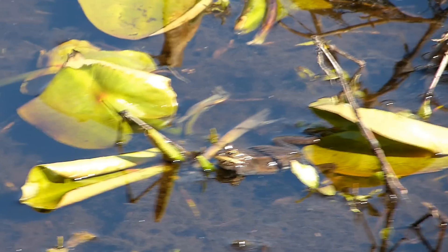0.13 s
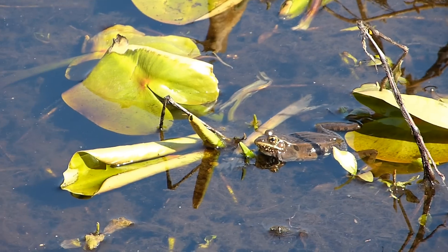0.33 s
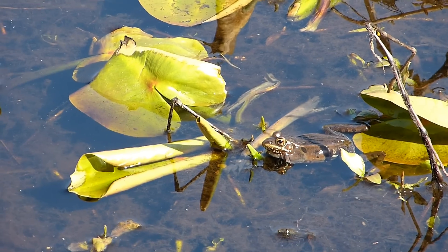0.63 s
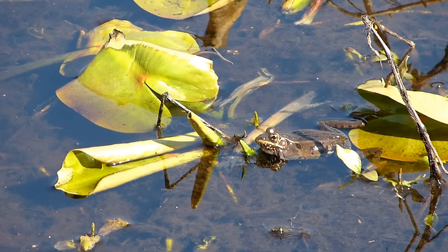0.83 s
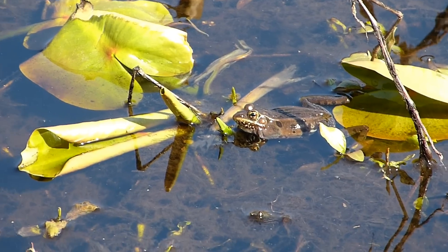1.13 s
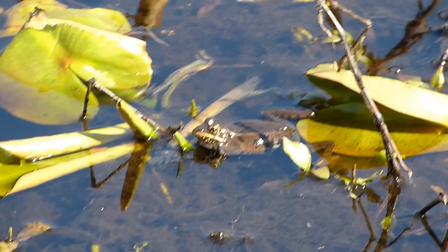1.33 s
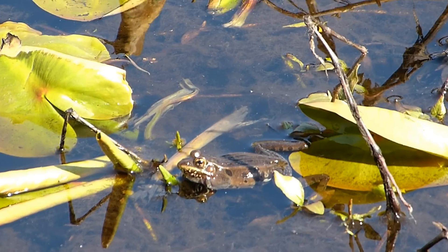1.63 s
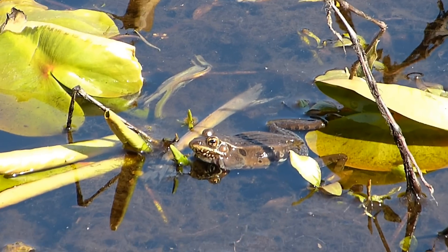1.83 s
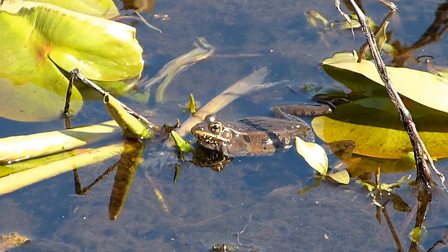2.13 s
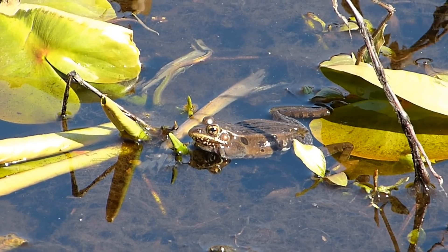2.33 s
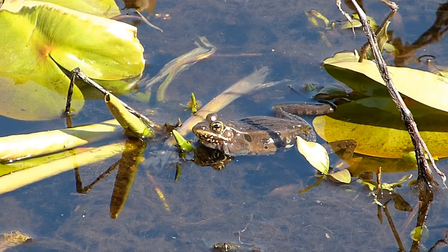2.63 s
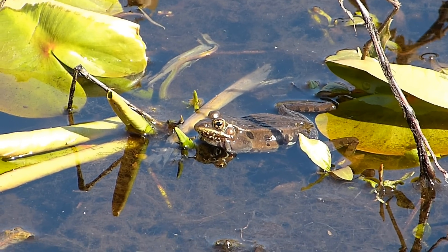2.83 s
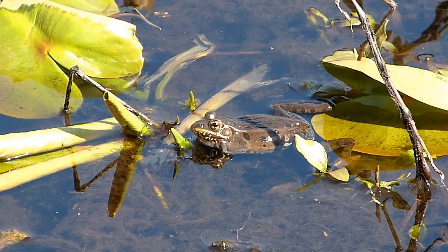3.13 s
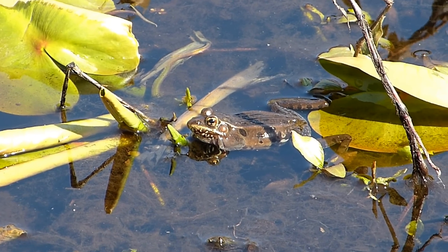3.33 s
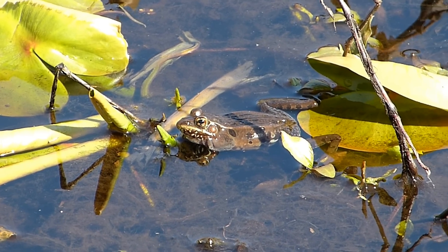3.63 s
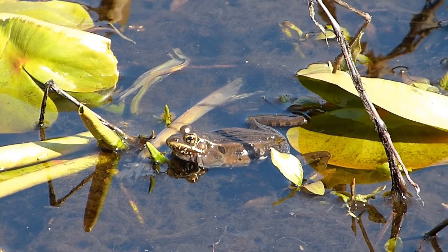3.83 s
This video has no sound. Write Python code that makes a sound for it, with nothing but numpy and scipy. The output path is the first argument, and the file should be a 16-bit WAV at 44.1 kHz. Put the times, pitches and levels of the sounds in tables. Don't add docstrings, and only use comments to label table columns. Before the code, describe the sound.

Many frogs call in quick, rattling, overlapping croaks while a distant engine hums, slows and fades.

```python
import sys
import numpy as np
from scipy import signal
from scipy.fft import rfft, irfft
from scipy.io import wavfile
from scipy.ndimage import uniform_filter1d

SR = 44100
rng = np.random.default_rng(int(sys.argv[2]) if len(sys.argv) > 2 else 0)


def gain_from_db(level_db):
    decades = np.asarray(level_db, float) / 20
    return 10 ** decades


def int16_out(signal):
    q = np.round(np.clip(np.atleast_2d(signal).T, -1, 1) * 32767)
    wavfile.write(sys.argv[1], SR, q.astype(np.int16))


N = 176400


def ring(x, hz, width):
    return signal.lfilter(*signal.iirpeak(min(hz, SR / 2.2), hz / width, SR), x)


def ring_twice(x, hz, width):
    return ring(ring(x, hz, width), hz, width)


def on_log(table, hz):
    table_hz, value = np.array(table).T
    return np.interp(np.log(np.maximum(hz, 1)), np.log(table_hz), value)


def walk(rate):
    k = int(SR / rate)
    steps = np.repeat(rng.standard_normal(N // k + 1), k)
    return 1.4 * uniform_filter1d(uniform_filter1d(steps, k), k)[:N]


def peak_one(x):
    return x / np.sqrt(uniform_filter1d(x ** 2, size=400).max())


def add(out, x, start_s, pan_db=0.):
    i = int(start_s * SR)
    x = x[max(-i, 0):max(N - i, 0)]
    i = max(i, 0)
    out[:, i:i + len(x)] += x * gain_from_db(np.array([[pan_db], [-pan_db]]) / 2)


# frequency in Hz, level in dB per Hz.
AIR = [(18, -45), (30, -29), (184, -2), (394, -12.5), (937, -10), (1500, -5.5), (2170, -37.5),
       (4910, -23.5), (16000, -50.5)]


def air():
    out = 0
    for hz in 32 * 2 ** np.arange(0, 9.1, .5):
        mid, side = (ring_twice(rng.standard_normal(N), hz, hz / 2) for _ in range(2))
        spread = np.clip(hz / 6600, .3, .9) * side * np.array([[1], [-1]])
        out = out + gain_from_db(on_log(AIR, hz) + 2.5 * walk(5.86)) * (mid + spread)
    return out * gain_from_db(-49) / np.sqrt(np.mean(out ** 2))


# centre in Hz, width in Hz, level in dB.
SAC = [(1247, 203, -2.5), (1447, 155.5, 2.5), (1572, 235, -7.5), (1980, 390, -23), (2523, 168, -23),
       (3330, 1600, -41)]


def chorus():
    noise = rng.standard_normal((2, N)) * gain_from_db(2 * walk(30) + 2.2 * walk(4))
    noise = noise[0] + 0.56 * noise[1] * np.array([[1], [-1]])
    wash = sum(gain_from_db(db) * ring_twice(noise, hz, width * 1.5) for hz, width, db in SAC[:4])
    return wash * gain_from_db(-45) / np.sqrt(np.mean(wash ** 2))


# start in seconds, length in seconds.
RUSTLE_TIMES = [(2.607, .018), (.65, .085), (3.39, .27), (3.77, .05), (1.6, .022), (2.2, .1)]
# centre in Hz, width in Hz, level in dB.
RUSTLE_COLOURS = [(3730, 3440, -30), (5900, 4500, -49), (7820, 3300, -53.5), (3870, 220, -30),
                  (3200, 230, -38), (3210, 220, -37.5)]


def rustles():
    out = np.zeros((2, N))
    noises = rng.standard_normal((len(RUSTLE_COLOURS), 2, 16384))
    for (s, length_s), (hz, width, db), noise in zip(RUSTLE_TIMES, RUSTLE_COLOURS, noises):
        progress = np.clip(np.arange(16384) / SR / length_s, 0, 1)
        fade = np.clip(np.sin(np.pi * progress) * 4, 0, 1)
        grains = noise[0] * gain_from_db(8 * uniform_filter1d(noise[1], size=16))
        add(out, gain_from_db(db) * fade * ring_twice(grains, hz, width), s, -3)
    return out


# start in seconds, length in seconds, pitch in Hz, level in dB, warbles per second.
PEEP = (3.29, .14, 3250, -55, 60)


def peep():
    out = np.zeros((2, N))
    s, length_s, hz, db, warble_hz = PEEP
    t = np.arange(int(length_s * SR)) / SR
    warble = 1 + .5 * np.sin(2 * np.pi * warble_hz * t)
    add(out, gain_from_db(db) * np.sin(np.pi * t / length_s) * warble * np.sin(2 * np.pi * hz * t), s)
    return out


# start in seconds, level in dB.
TICKS = [(3.719, -55), (3.738, -55), (3.7562, -60.5), (3.7753, -49.5), (3.7944, -53), (3.8135, -53)]


def cricket():
    out = np.zeros((2, N))
    wing_hz, width_hz = 6853, 1300
    for s, db in TICKS:
        scrape = rng.standard_normal(400) * np.exp(-np.arange(400) / 64)
        tick = ring(ring(scrape, wing_hz, width_hz), wing_hz, 2 * width_hz)
        add(out, gain_from_db(db - 4.5) * peak_one(tick), s)
    return out


# time in seconds, firing rate in Hz, level in dB, brightness in dB, unevenness in dB.
ENGINE = [(.33, 73.7, -37, -1, -1), (.58, 74.5, -44, -7.5, 5.5), (0.871, 74.4, -40.5, -0.5, 1),
          (1.2, 74.7, -37, 0.5, -1), (1.42, 73.4, -39, -0.3, 1), (1.6, 70.3, -36, 7.5, -14.5),
          (1.8, 65.8, -34.5, 7, -9.5), (2.0, 62.6, -32.5, 8, -13.5), (2.2, 60.3, -32.5, 7, -8.5),
          (2.4, 58.2, -36.5, 5.5, -4), (2.6, 57.1, -43.5, 7.5, -4), (2.85, 55.0, -47, 6.5, -0.5),
          (3.15, 52, -51.5, 1.5, 2.5), (3.609, 49.5, -61, -3, 6), (3.8, 53.7, -48.5, 3, -1),
          (4.0, 59.0, -46, 0, 2)]
# frequency in Hz, gain in dB.
EXHAUST = [(55, -36), (75, -16), (120, -10), (148, -1.5), (225, 0), (290, -1.5), (330, -12), (400, -26)]
HALF_ORDER_DB, QUARTER_ORDER_DB = -11.5, -9.5
UNEVEN_FROM_HZ = 232


def engine():
    s, *columns = np.array(ENGINE).T
    t = np.arange(N) / SR
    hz, db, bright_db, uneven_db = (np.interp(t, s, column) for column in columns)
    firing = hz * (1 + 0.0024 * walk(9))
    turn = 2 * np.pi * np.cumsum(firing) / SR
    out, power = 0, 0
    quarter_db = QUARTER_ORDER_DB + uneven_db
    for k in range(3, 26):
        order = k / 4
        f = firing * order
        order_db = (0, quarter_db, HALF_ORDER_DB, quarter_db)[k % 4]
        if k % 4 > 0:
            order_db = order_db + 14 * np.minimum(np.log2(f / UNEVEN_FROM_HZ), 0)
        slope_db = (1.8 * bright_db - 6) * np.clip(order - 3, 0, 1) - 6.4 * max(order - 4, 0)
        gain = gain_from_db(order_db + on_log(EXHAUST, f) + slope_db)
        flutter = gain_from_db(1.94 * walk(8.15))
        out = out + gain * flutter * np.sin(turn * order + 2 * np.pi * rng.random())
        power = power + gain ** 2 / 2
    hum_hz = 103 * (1 + .015 * walk(3))
    hum = gain_from_db(-61 + 1.8 * walk(4.4)) * np.sin(2 * np.pi * np.cumsum(hum_hz) / SR)
    return out / np.sqrt(power) * gain_from_db(db - 1.5) + hum


PEAK = 4096
SWELL_S, KNEE_S, LEAD_IN_DB, FADE_S = .014, 0.023, -9.5, 0.0053
JITTER, SCATTER_DB, SLOWING_PER_S = .04, 1.8, 4.0
RASP = .2


def throat_pulses(t, size, centre_s, swell_s):
    s = t - centre_s
    rise = np.exp(-(s / swell_s) ** 2) + gain_from_db(LEAD_IN_DB) * np.exp(s / KNEE_S)
    shape = np.where(s < 0, rise, np.exp(-(s / FADE_S) ** 2))
    clicks = np.bincount(np.round(t * SR).astype(int) + PEAK, shape * size, minlength=6144)
    breath = signal.lfilter([.15], [1, -.985], clicks)
    return clicks + RASP * breath * rng.standard_normal(6144)


# centre in Hz, width in Hz, level in dB.
CHEST = [(508.7, 81, 1), (596, 84.6, -1), (870, 128, -2), (983, 152, -3)]


def croak(rate, overtone_db, chest_db, overtone_hz, chance, width=330, early_s=0.0066):
    slowing = SLOWING_PER_S * np.arange(30)[::-1] / rate / 2
    gaps = (1 + JITTER * chance[10:40] - slowing) / rate
    t = np.cumsum(gaps) - gaps[:26].sum() + 0.00074 * chance[0]
    t = t[t > -.09]
    size = gain_from_db(SCATTER_DB * chance[40:40 + len(t)])
    tune = 1 + .018 * chance[1]

    main = throat_pulses(t, size, 0, SWELL_S)
    sac = 0
    for k, (f, w, db) in enumerate(SAC):
        sac = sac + (-1) ** k * gain_from_db(db + 1.3 * chance[2 + k]) * ring_twice(main, f * tune, w * 1.48)

    late = throat_pulses(t, size, 0.0033, SWELL_S)
    chest = 0
    for k, (f, w, db) in enumerate(CHEST):
        chest = chest + gain_from_db(db + 1.8 * chance[6 + k]) * ring_twice(late, f * tune, w * 1.68)

    hz = overtone_hz * (1 + 0.0092 * chance[3])
    high = ring(ring(throat_pulses(t, size, -early_s, 0.024), hz, width * 2), hz, width)

    burst = chance[70:] * np.exp(-np.arange(60) / 22)
    snap = np.diff(ring(np.convolve(main, burst)[:6144], 6500, 9000), prepend=0)
    return (peak_one(sac) + gain_from_db(chest_db) * peak_one(chest) + gain_from_db(overtone_db) * peak_one(high)
            + gain_from_db(-55) * peak_one(snap))


def far_frogs():
    out = np.zeros((2, N))
    for k, chance in enumerate(rng.standard_normal((130, 130))):
        call = croak(270 + 25 * chance[5], -25.5, -3.5, 4600 + 250 * chance[9], chance)
        add(out, gain_from_db(-46.5 + 3.5 * chance[8]) * call, (k + chance[69]) * N / SR / 130, 2.7 * chance[4])
    return out


# loudest moment in seconds, level in dB, pulses per second, overtone in dB, chest in dB.
BIG_FROGS = [(0.332, -23.5, 248, -24.5, -5), (0.917, -19.5, 296.0, -25, -10), (0.902, -28, 290, -20, -9),
             (1.54, -18, 245, -23.5, -9.5), (2.02, -13.5, 320, -18, -10), (2.133, -19.5, 265, -21.5, -10),
             (2.157, -25, 180, -23, -4), (2.215, -24, 310, -34.5, -6.5), (2.444, -17.5, 313.0, -11.5, -7),
             (2.652, -35.5, 245, -34, 2.5), (2.739, -16, 250, -24.5, -8), (2.829, -32.5, 243, -34, -3),
             (3.304, -19.5, 270, -27.5, -8), (3.329, -30, 152, -37, -4.5),
             (3.452, -15.0, 254, -23.0, -11.5), (3.437, -28.5, 280, -21, -11),
             (3.496, -18.5, 290, -17.5, -3.5), (3.659, -22, 280, -32, -15), (3.977, -26, 257, -40, -6.5)]
MIDDLE_FROGS = [(0.376, -12, 289, -29, -12), (0.95, -13.5, 236, -28, -8.5), (1.57, -14.5, 312, -27.5, -10),
                (2.908, -15, 320.0, -18.5, -9.5), (1, -25, 430, -24.5, -7.5), (0.969, -22.5, 260, -33, -11),
                (1.554, -21.5, 280, -28.5, -8.5), (1.594, -18.5, 270, -35, -12),
                (0.689, -21.5, 270, -27, -9.5), (3.838, -21.5, 240, -22.5, -13),
                (2.432, -19.5, 330, -22.5, -6), (1.907, -20.5, 270, -29.5, -8)]
# loudest moment in seconds, level in dB, overtone in dB, chest in dB.
SMALL_FROGS = [(0.701, -15, -31.0, -12), (1.262, -22.5, -28, -11.5), (1.287, -16, -29.5, -9.5),
               (1.917, -16, -35, -15.5), (1.929, -21, -30, -7), (2.259, -14, -36, -9.5),
               (2.565, -19, -29, -13), (2.589, -12.5, -34.5, -11.5), (2.875, -16, -36, -9.5),
               (3.118, -17.5, -32, -11.5), (3.206, -18.5, -28.5, -10.5), (3.225, -13, -32, -9.5),
               (3.53, -19, -30, -8), (3.551, -19.5, -37, -13.5), (3.826, -20, -27, -15.5),
               (3.853, -11.5, -33, -13.5), (3.876, -16.5, -31, -6)]
FAINT_FROGS = [(0.401, -26, -26, -3.5), (0.616, -36.5, -38, -4), (0.678, -24.5, -29, -6.5),
               (0.728, -38, -22, -16), (0.99, -22, -38, -7), (1.376, -24.5, -30.5, -10.5),
               (1.4, -35.5, -30, -2.5), (1.614, -22.5, -38, -8), (1.72, -33, -34, 0), (1.951, -34, -34, 4),
               (2.346, -28.0, -31.5, -4), (2.858, -23.5, -37, -13.5), (3.051, -28, -41, 0.5),
               (3.572, -22, -33, -3.5), (3.621, -26, -29, -8)]
THIN_FROGS = [(0.644, -22, -31.5, -8), (1.179, -19, -31.5, -12), (1.839, -21.5, -30, -8),
              (2.485, -18, -34, -12.5), (2.997, -22.5, -27.5, -11)]
BIG_HZ, MIDDLE_HZ, SMALL_HZ, THIN_HZ = 4230, 4680, 4780, 5110


def near_frogs():
    out = np.zeros((2, N))

    def place(call, s, db, chance):
        add(out, gain_from_db(db - 3) * call, s - PEAK / SR, 1.5 * chance[4])

    for table, hz, width in ((BIG_FROGS, BIG_HZ, 450), (MIDDLE_FROGS, MIDDLE_HZ, 500)):
        for (s, db, rate, over_db, chest_db), chance in zip(table, rng.standard_normal((len(table), 130))):
            place(croak(rate, over_db, chest_db, hz, chance, width), s, db, chance)
    for table, hz, *colour in ((SMALL_FROGS, SMALL_HZ), (FAINT_FROGS, SMALL_HZ), (THIN_FROGS, THIN_HZ, 170, .006)):
        for (s, db, over_db, chest_db), chance in zip(table, rng.standard_normal((len(table), 130))):
            rate = 255 * (1 + .08 * chance[5])
            place(croak(rate, over_db, chest_db, hz, chance, *colour), s, db, chance)
    return out


def reeds(calls):
    t60_s, level_db = 0.19, -11.5
    t = np.arange(16384) / SR
    tail = rng.standard_normal((2, 16384)) * gain_from_db(-60 * t / t60_s) * (t > .004)
    tail = (tail[0] + .45 * tail[1] * np.array([[1], [-1]])) / np.sqrt(np.sum(tail[0] ** 2))
    return gain_from_db(level_db) * signal.fftconvolve(calls, tail, axes=1)[:, :N]


# frequency in Hz, left minus right in dB.
EAR_DB = [(80, 2.5), (300, -10), (1290, -6.5), (2380, -7), (4400, -1), (15000, -4)]
# frequency in Hz, left lead in radians.
EAR_LEAD = [(60, -0.21), (260, -0.58), (520, 0.91), (1500, 0.68), (2400, 1), (4500, -0.64)]


def camera_shade(x):
    hz, ear = np.arange(N // 2 + 1) * SR / N, np.array([[.5], [-.5]])
    shade = gain_from_db(ear * on_log(EAR_DB, hz)) * np.exp(1j * ear * on_log(EAR_LEAD, hz))
    return irfft(rfft(x) * shade, N)


def scene():
    no_bass = signal.butter(6, 460, "high", fs=SR, output="sos")
    calls = signal.sosfilt(no_bass, far_frogs() + near_frogs())
    one_side = calls + reeds(calls) + engine() + chorus()
    return camera_shade(one_side) + cricket() + peep() + rustles() + air()


def low_pass(x):
    return signal.sosfilt(signal.butter(12, 16310, fs=SR, output="sos"), x)


def record(dry):
    start_s, cut_in_s = .3213, .0006
    dull = signal.sosfilt(signal.butter(10, 15000, fs=SR, output="sos"), dry)
    mix = dull * np.clip((np.arange(N) / SR - start_s) / cut_in_s, 0, 1)
    return low_pass(mix)


dry = scene()
out = record(dry)
int16_out(out)
```